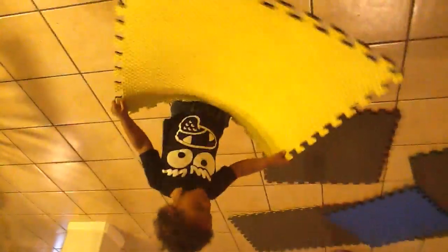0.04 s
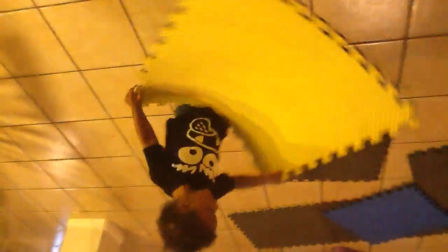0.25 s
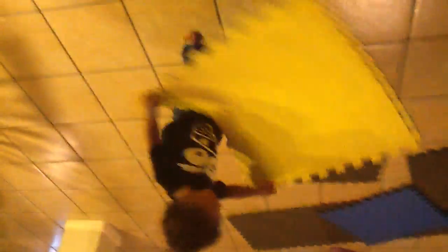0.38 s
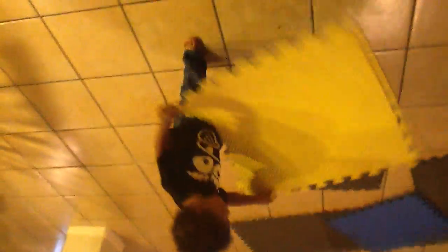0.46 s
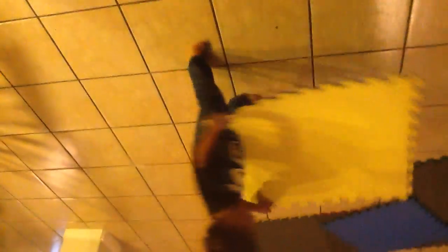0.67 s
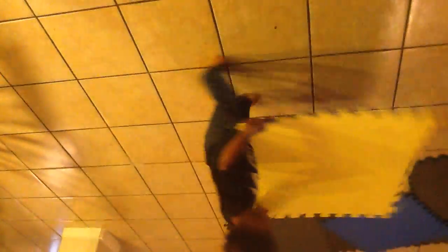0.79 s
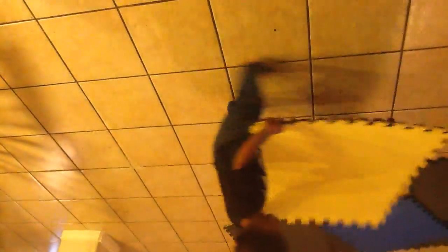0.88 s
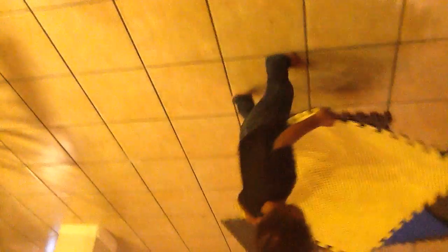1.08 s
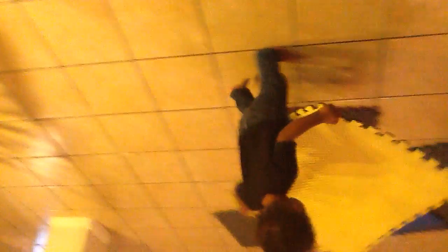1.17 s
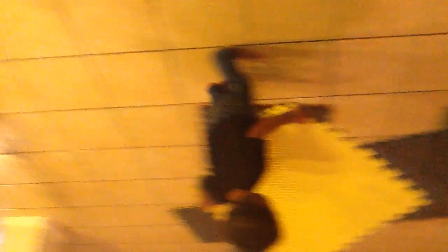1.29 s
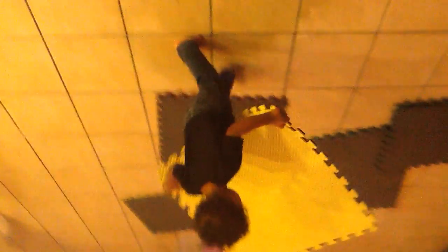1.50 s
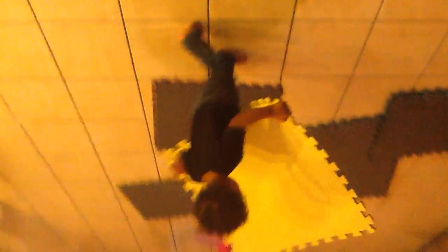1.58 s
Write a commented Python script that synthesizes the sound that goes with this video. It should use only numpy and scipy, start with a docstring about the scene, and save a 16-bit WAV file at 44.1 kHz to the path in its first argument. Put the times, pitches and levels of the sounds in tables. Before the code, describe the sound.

A foam mat slaps down onto a tiled floor after a soft flap and a knock.

```python
"""Foam mat in a tiled room

A large foam mat is swung round: it flaps once, then slaps down flat, squeezing out bursts of air
that set the room reverberating. Close by, fingers knock and tick on a hand-held camera, exciting
the damped modes of its case. Mat and clothes rustle by friction over a quiet room tone."""
import sys
import numpy as np
from scipy import signal
from scipy.fft import rfft, irfft
from scipy.io import wavfile
from scipy.ndimage import uniform_filter1d

SR = 44100
rng = np.random.default_rng(int(sys.argv[2]) if len(sys.argv) > 2 else 0)


def store_pcm(level_fs):
    """Save levels as 16-bit WAV."""
    pcm = np.round(np.clip(level_fs, -1, 1) * 32767).astype(np.int16)
    wavfile.write(sys.argv[1], SR, np.atleast_2d(pcm).T)


N = 72765

# parts of the mat meeting the floor (time [s], relative level [dB], time constant [s], crack [ratio])
SLAP_BURSTS = [(1.1885, -32.5, 0.0024, 0), (1.1950, -1.5, 0.0032, 0), (1.2046, -2, 0.00077, 0.35),
               (1.2075, 1, 0.00079, 0.063), (1.2100, -5, 0.00076, 0), (1.2156, -4, 0.00052, 0.69)]
# spectrum of the slap (frequency [Hz], relative density [dB])
SLAP_SPECTRUM = [(40, -21), (110, -18), (170, -5.5), (250, -2.5), (380, 1), (510, 2.5), (590, -13),
                 (730, -7.5), (930, -14.5), (1100, -12.5), (1450, -9), (1600, -15.5), (2600, -17),
                 (4400, -15.5), (5150, -8), (6000, -5), (7000, -13.5), (10300, -16.5), (12000, -20.5),
                 (13300, -34), (15000, -24)]
def slap():
    """Distributed impact: the mat lands part by part within a few hundredths of a second."""
    return foam_bursts(SLAP_BURSTS, SLAP_SPECTRUM, level_db=9, room_db=2.5)


def air_puff(time_s=1.192, hz=330, level_db=-21, width_s=0.0022):
    """Air displacement: the cushion under the mat escapes as one pulse just ahead of the slap."""
    t = np.arange(N) / SR - time_s
    return -amp(level_db) * np.sin(2 * np.pi * hz * t) * gaussian(t, width_s)


# the mat flapping in the air (time [s], relative level [dB], time constant [s], crack [ratio])
FLAP_BURSTS = [(.8094, 1.5, 0.00059, 0.57), (.8206, 0, .001, 0.27), (.833, -5.5, 0.0028, 0.086),
               (.852, -10, 0.00083, 0.13), (.867, -6.5, 0.0019, 0.12)]
# spectrum of the flap (frequency [Hz], relative density [dB])
FLAP_SPECTRUM = [(24, -56), (40, -28), (91, -23), (162, 0), (197, -11), (287, -1), (637, -1.5), (881, -32),
                 (1450, -16), (1910, -35.5), (3060, -26), (3840, -26.5), (5860, -14.5), (15500, -38)]
def flap():
    """Transient train: the swinging mat gives off quick bursts that are heard as one flap."""
    return foam_bursts(FLAP_BURSTS, FLAP_SPECTRUM, level_db=-11, room_db=5.5)


def foam_bursts(bursts, spectrum, level_db, room_db):
    """Source and filter: bursts of squeezed air, some with a crack, and their echoes share a spectrum."""
    t, out = np.arange(SR // 10) / SR, np.zeros(N)
    for time_s, db, tau_s, crack in bursts:
        air = rng.standard_normal(len(t)) * t * np.exp(-t / tau_s)
        burst = air / np.linalg.norm(air) - crack * (t == 0)
        direct = np.zeros(N)
        add(direct, time_s, amp(db) * burst / np.linalg.norm(burst))
        out += direct + amp(room_db) * reverberation(direct)
    return amp(level_db) * colour(out, spectrum)


# hard touches (time [s], gain [dB], low-pass cutoff [Hz], snap [ratio], mode pitch [ratio])
FINGER_TICKS = [(.0096, -20, 9100, 0.14, 1.35), (.2193, 3.5, 6500, 0.53, 0.98), (.2306, -0.5, 1500, 1, 1),
                (0.4098, -24, 695, .5, 0.59), (0.4732, -38.5, 12000, .6, 1.02), (.6412, -28, 6500, .05, 3),
                (1.3811, -5, 12900, 0.23, 1.347), (1.4296, -9, 1330, .05, 1.02)]
# modes of the camera case at pitch ratio 1 (frequency [Hz], relative level [dB], T60 [s])
CASE_MODES = [(793, -15, 0.0089), (1500, -7.5, 0.0059), (2660, -4, 0.004), (3875, -8.5, 0.0068),
              (5250, -11, 0.0058), (7140, -1.5, 0.002), (10500, -4, 0.0031)]
def case_ticks():
    """Modal ringing: a hard touch snaps and rings the camera case, at a pitch set by the spot struck."""
    t, out = np.arange(SR // 10) / SR, np.zeros(N)
    for time_s, db, cutoff_hz, snap, pitch in FINGER_TICKS:
        modes = sum((-1) ** k * amp(mode_db) * damped_mode(t * pitch, hz, t60)
                    for k, (hz, mode_db, t60) in enumerate(CASE_MODES))
        lowpass = signal.butter(2, cutoff_hz, fs=SR)
        add(out, time_s, amp(db) * signal.lfilter(*lowpass, modes + snap * (t == 0)))
    return out


# soft pushes of the fingers (time [s], gain [dB], frequency [Hz], T60 [s])
FINGER_THUMPS = [(.2203, 9, 194, .021), (0.3508, -37, 136.5, 0.058), (0.3586, -35, 167.5, 0.027),
                 (0.4106, -24, 170, .025), (1.3958, -26, 192, 0.037), (1.4288, -21, 307, 0.043)]
def case_thumps(rise_s=0.0019, overtone_db=-3.5):
    """Structure-borne sound: a soft push reaches the microphone through the case as two low modes."""
    t, out = np.arange(SR // 10) / SR, np.zeros(N)
    attack = 1 - np.exp(-t / rise_s)
    for time_s, db, hz, t60 in FINGER_THUMPS:
        overtone = amp(overtone_db) * damped_mode(t, 2.18 * hz, 0.63 * t60)
        add(out, time_s, amp(db) * attack * (overtone - damped_mode(t, hz, t60)))
    return out


# envelope of the rustle (time [s], level [dB])
RUSTLE_ENVELOPE = [(0, -42.5), (.05, -44.5), (.09, -48), (.17, -45), (.22, -44.5), (.3, -62), (.39, -53),
                   (.43, -53), (.52, -56), (.68, -54), (.72, -55), (.77, -52.5), (.85, -51), (1.15, -53),
                   (1.5, -49.5), (1.65, -48.5)]
# spectrum of the rustle (frequency [Hz], relative density [dB])
RUSTLE_SPECTRUM = [(24, -82), (40, -57), (91, -14.5), (154, 2), (301, 2.5), (325, 1), (484, 2.5), (621, -5),
                   (686, -0.5), (2220, -16.5), (4130, -18), (4920, -15.5), (15500, -26.5)]
# brief bright hisses, two just after the knock
# (time [s], level [dB], width [s], centre [Hz], width [octaves])
BRIGHT_HISSES = [(.15, -61, 0.084, 5660, 0.069), (0.169, -49.5, 0.012, 4970, 0.16),
                 (0.259, -56.5, 0.012, 2420, 0.47), (.262, -58.5, 0.023, 7260, 0.64),
                 (.43, -58, 0.018, 8000, 0.44), (0.683, -55.5, 0.019, 5570, 0.37),
                 (0.767, -52.5, 0.03, 6630, 0.61), (.98, -57.5, 0.068, 5840, .12),
                 (1.54, -56, .09, 5250, .08)]
# dull shuffles on the floor (time [s], level [dB], width [s], centre [Hz], width [octaves])
FLOOR_SHUFFLES = [(.98, -55, 0.023, 262, 0.52), (1.1, -52, 0.02, 130, 0.25)]
def rustle(grain_db=1.2):
    """Friction noise: foam and cloth rub grainily; brief bright hisses and dull shuffles sound too."""
    t, hz = np.arange(N) / SR, np.fft.rfftfreq(N, 1 / SR)
    grain = amp(grain_db * unit_rms(uniform_filter1d(rng.standard_normal(N), size=150)))
    envelope = amp(np.interp(t, *np.transpose(RUSTLE_ENVELOPE)))
    out = envelope * colour(unit_rms(grain * rng.standard_normal(N)), RUSTLE_SPECTRUM)
    for time_s, db, width_s, centre_hz, octaves in BRIGHT_HISSES + FLOOR_SHUFFLES:
        band = gaussian(np.log2((hz + 1) / centre_hz), octaves)
        hiss = irfft(rfft(rng.standard_normal(N)) * band, N)
        out += amp(db) * unit_rms(grain * hiss) * gaussian(t - time_s, width_s)
    return out


# reverberation time of the tiled room (frequency [Hz], T60 [s])
ROOM_T60 = [(100, 0.4), (400, 0.66), (1300, 0.7), (3000, 0.73), (5300, 0.58), (7000, 0.45), (9500, 0.48),
            (15000, .38)]
def reverberation(x, delay_s=0.0015, build_s=0.0013):
    """Diffuse field: dense reflections off tiles and walls decay exponentially, each band at its rate."""
    hz, t, bands = signal.stft(rng.choice([-1., 1.], N), SR, nperseg=256)
    decay = np.exp(-np.log(1000) * t / at_frequency(ROOM_T60, hz)[:, None])
    tail = signal.istft(bands * decay, SR, nperseg=256)[1][:N]
    tail *= np.clip((np.arange(N) / SR - delay_s) / build_s, 0, 1)
    return signal.fftconvolve(x, tail / np.linalg.norm(tail))[:N]


# spectrum of the room tone (frequency [Hz], relative density [dB])
TONE_SPECTRUM = [(18, -72), (30, -59), (168, -4), (315, -27), (389, 0.5), (921, -8.5), (1110, -24),
                 (1440, -18.5), (1680, -11.5), (2070, -17), (4090, -28.5), (5040, -15.5), (15500, -31.5)]
def room_tone(level_db=-56.5):
    """Stationary noise: a quiet, coloured background."""
    return amp(level_db) * colour(rng.standard_normal(N), TONE_SPECTRUM)


def colour(x, spectrum, size=4096):
    """Minimum-phase filtering: imposes a spectrum through a causal response of unit energy."""
    hz = abs(np.fft.fftfreq(size, 1 / SR))
    log_gain = np.log(amp(at_frequency(spectrum, hz)))
    response = np.exp(np.conj(signal.hilbert(log_gain)))
    taps = np.fft.ifft(response).real[:size // 2]
    return signal.fftconvolve(x, taps / np.linalg.norm(taps))[:len(x)]


def damped_mode(t, hz, t60):
    """Damped oscillation: a sine that falls 60 dB in t60 seconds."""
    return np.sin(2 * np.pi * hz * t) * np.exp(-np.log(1000) * t / t60)


def gaussian(x, width):
    """Bell curve of peak 1 and standard deviation width."""
    return np.exp(-.5 * (x / width) ** 2)


def amp(db):
    """Decibels to amplitude ratio."""
    return 10 ** (np.asarray(db) / 20)


def unit_rms(x):
    """Normalisation to rms 1."""
    return x / np.sqrt(np.mean(x ** 2) + 1e-20)


def at_frequency(table, hz):
    """Interpolation on a log-frequency axis."""
    table_hz, values = np.transpose(table)
    return np.interp(np.log(hz + 1), np.log(table_hz + 1), values)


def add(mix, time_s, sound):
    """Mixes a sound in at time_s."""
    part = mix[round(time_s * SR):][:len(sound)]
    part += sound[:len(part)]


def scene():
    """Superposition: all sources sum into one channel."""
    return (room_tone() + slap() + air_puff() + flap() + rustle() + case_ticks() + case_thumps())[None]


def record(dry, bass_hz=85, treble_hz=15400):
    """Band limiting and overload: the microphone sheds deep bass, clips, then loses the top treble."""
    thin = signal.lfilter(*signal.butter(2, bass_hz, "high", fs=SR), dry)
    lowpass = signal.firwin(511, treble_hz, window=("kaiser", 9), fs=SR)
    return signal.oaconvolve(np.clip(thin, -1, 1), lowpass[None], "same")


dry = scene()
out = record(dry)
store_pcm(out)
```